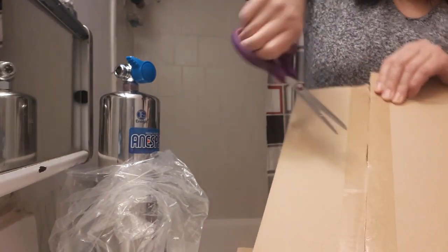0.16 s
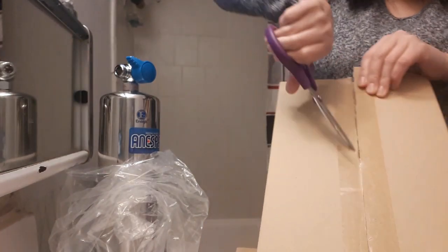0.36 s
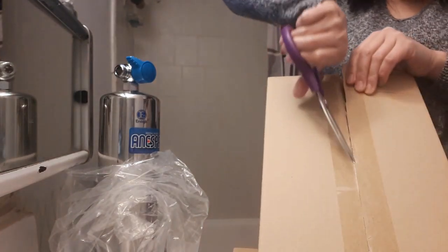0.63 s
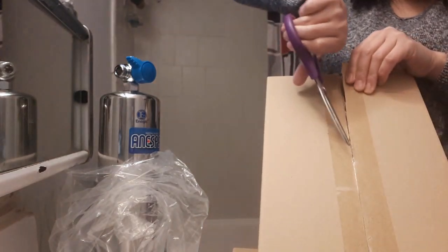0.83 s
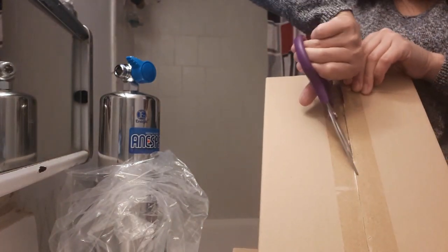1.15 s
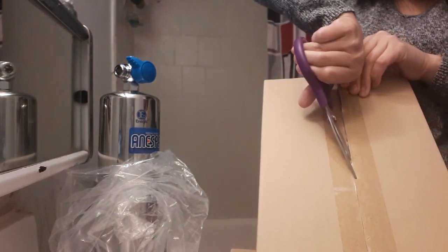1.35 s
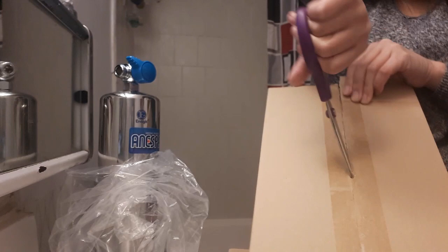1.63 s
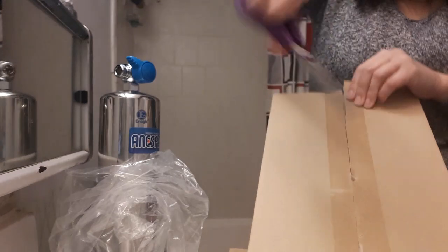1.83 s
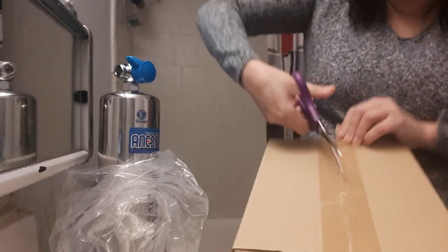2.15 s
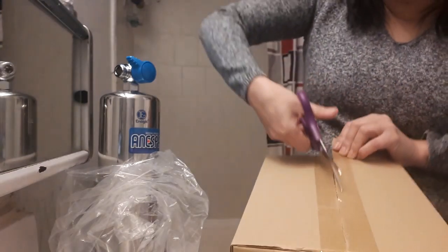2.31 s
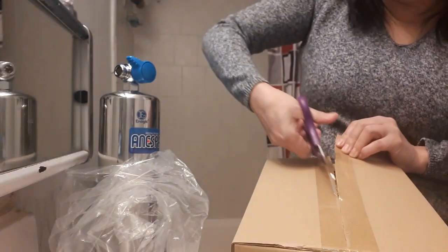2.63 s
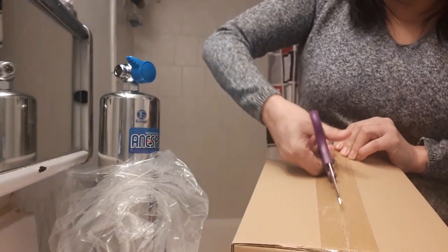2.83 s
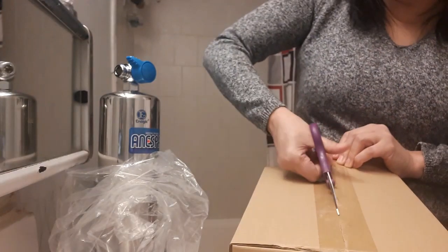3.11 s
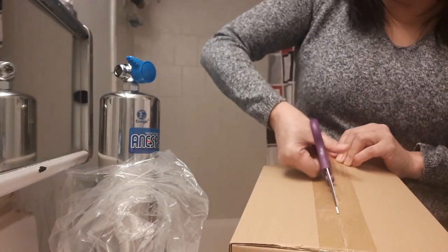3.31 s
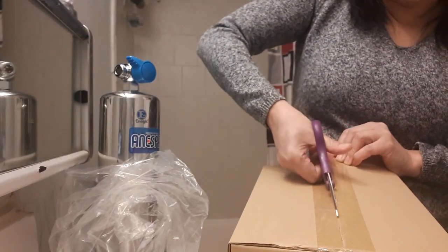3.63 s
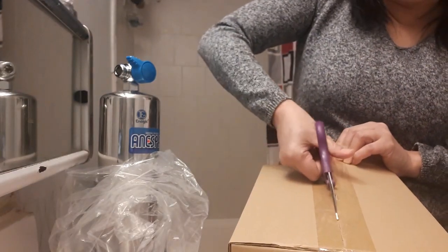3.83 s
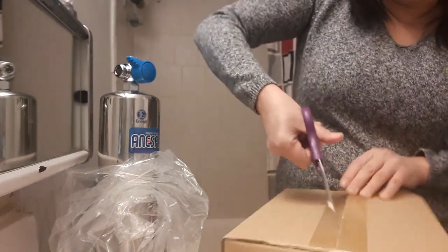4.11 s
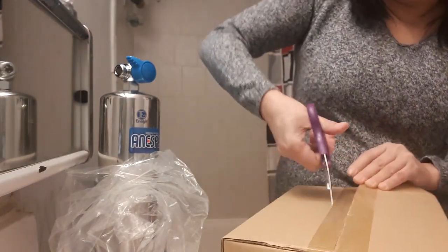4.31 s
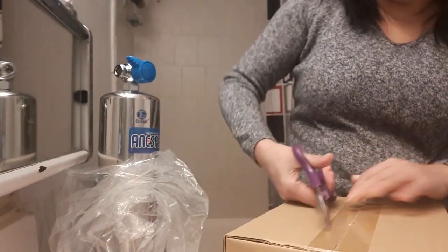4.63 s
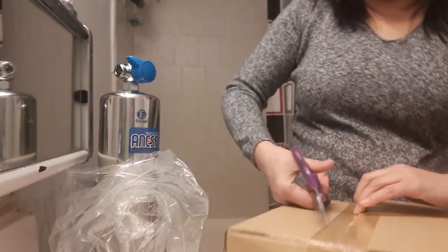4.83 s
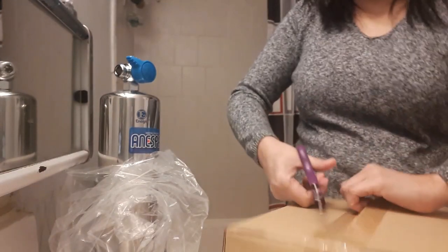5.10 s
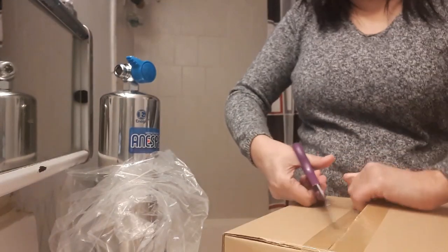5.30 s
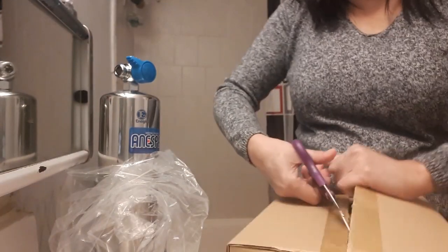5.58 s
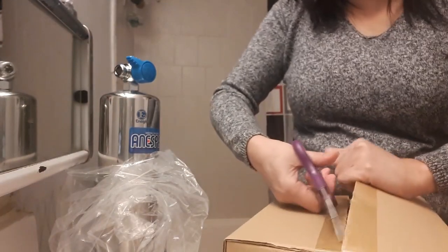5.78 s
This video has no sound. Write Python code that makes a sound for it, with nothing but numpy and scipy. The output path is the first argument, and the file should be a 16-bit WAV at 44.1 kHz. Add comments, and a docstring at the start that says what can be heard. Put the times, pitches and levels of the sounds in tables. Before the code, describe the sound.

Close, dry tape scraping and jerky boxy thumps as scissor blades work along a carton seam in a small quiet room.

```python
"""Scissors slit the packing tape on a cardboard box, close by in a small quiet room.
Two pushes hiss along the seam (filtered slips); the rubbed blades sing (a high resonance), light skims hiss.
Jerks then knock the hollow box (blows through its modes); fibres tick, tape twangs twice, cardboard rubs, creaks.
Heavy knocks after 4 s make the box boom on its support (a low decaying mode); the blades click (noise cracks).
At the end a run of ticks and a strong push rip a flap free. Faint room air (noise) lies under it all."""
import sys
import numpy as np
from scipy import signal
from scipy.io import wavfile

SR = 44100
rng = np.random.default_rng(int(sys.argv[2]) if len(sys.argv) > 2 else 0)


def unload_audio(sound):
    """Save the sound as a 16-bit wav file, at the path given as the first command line argument."""
    columns = np.transpose(np.atleast_2d(sound))
    # keep every value between -1 and 1, then stretch to whole-number steps
    steps = np.round(np.clip(columns, -1, 1) * 32767)
    wavfile.write(sys.argv[1], SR, steps.astype(np.int16))


N = 262395
TIME_S = np.arange(N) / SR
RING_S = np.arange(20480) / SR  # time axis of responses and short sounds
IMPULSE = RING_S == 0

# pushes of the blade along the seam:
# (time of hardest push [s], build-up [s], let-go [s], tape hiss level [dB], cardboard judder level [dB])
STROKES = [(0.088, 0.11, 0.038, -35, -44), (0.126, 0.05, 0.018, -34, -32.5), (1.027, 0.038, 0.15, -47, -45),
           (1.11, 0.059, 0.063, -47.5, -41), (1.277, 0.1, 0.14, -43, -35.5), (1.559, 0.038, 1, -44, -38.5),
           (2.4, 0.036, 0.12, -42, -38), (2.534, 0.0096, 0.12, -40, -51), (2.859, 0.067, 0.099, -42.5, -37),
           (2.939, 0.064, 0.25, -48.5, -39), (3.305, 0.031, 0.092, -48.5, -43.5),
           (3.415, 0.033, 0.071, -38.5, -34.5), (3.609, 0.017, 0.29, -38.5, -34.5),
           (3.902, 0.048, 0.3, -41.5, -38.5), (4.01, 0.044, 0.22, -38.5, -35.5),
           (4.211, 0.15, 0.11, -33, -36.5), (4.506, 0.081, 0.15, -39.5, -50),
           (5.291, 0.029, 0.29, -42, -41.5), (5.65, 0.25, 0.17, -41, -35.5),
           (5.609, 0.044, 0.1, -33, -25.5)]
# blows on the box: (time [s], level [dB], highest fully driven frequency [Hz], bass from lid flex [dB])
KNOCKS = [(0.466, -28, 2400, 4.5), (0.807, -37, 1320, -1), (1.045, -24, 2370, 8), (1.601, -29, 1100, -11.5),
          (1.684, -17.5, 1410, 2), (1.8, -15, 1510, 2), (2.384, -28.5, 2810, 4), (2.531, -36.5, 500, 14),
          (2.607, -29.5, 1200, 7.5), (2.623, -26, 2200, 8), (2.796, -34.5, 700, 3.5), (2.841, -23, 1880, 2),
          (2.856, -21.5, 900, 0), (2.939, -34.5, 890, 1.5), (3.051, -34.5, 710, -2.5),
          (3.375, -20, 4980, 2.5), (3.835, -29, 900, -6), (4.184, -16, 900, -7), (4.196, -18, 1190, -6),
          (4.364, -33.5, 794, 0), (4.502, -19, 2400, -4), (4.519, -17.5, 1400, -3.5),
          (4.531, -15, 1170, -3.5), (4.546, -16.5, 900, -2.5), (4.568, -25, 700, -5.5),
          (4.665, -26, 520, 4.5), (5.232, -32.5, 2010, 8), (5.248, -19, 373, -4.5), (5.519, -31, 600, 5.5),
          (5.696, -26.5, 1500, 7.5)]
# parting tape fibres: (time [s], level before the tape spectrum [dB])
TICKS = [(1.533, -41), (1.543, -33), (1.5577, -31), (1.607, -29), (1.684, -21), (1.801, -25.5),
         (2.5409, -33), (3.2115, -34), (3.375, -28.5), (3.8873, -31.5), (3.908, -30.5), (3.993, -31),
         (4.151, -35.5), (4.5, -23.5), (5.246, -34), (5.2836, -27.5), (5.5612, -28), (5.583, -26),
         (5.595, -22), (5.604, -16.5)]
# twangs of taut tape as the blade pops through: (time [s], level [dB], pitch [Hz])
TWANGS = [(1.684, -13, 815), (3.376, -5.5, 1190)]
# light sliding touches of hand and sleeve, no pressure on the box: (middle [s], half length [s], level [dB])
SKIMS = [(0.385, 0.15, -46), (0.63, 0.16, -47), (2.182, 0.2, -50.5), (4.8, 0.22, -55.5),
         (5.152, 0.11, -44.5), (5.95, 0.064, -42.5)]
# cardboard rubs as the box is turned, pressed or dented: (middle [s], half length [s], level [dB])
RUBS = [(1.1, 0.046, -42.5), (1.28, 0.069, -43.5), (1.81, 0.043, -33), (3.025, 0.043, -45.5),
        (3.86, 0.21, -49.5), (4.541, 0.026, -24.5), (4.6, 0.042, -41), (5.049, 0.088, -44),
        (5.64, 0.033, -35.5)]
# cardboard creaks under the hands: (middle [s], level [dB], pitch [Hz], half length [s])
CREAKS = [(2.765, -46, 950, 0.03), (3.302, -41.5, 1040, 0.0063), (3.882, -40.5, 226, 0.25),
          (3.949, -36.5, 1080, 0.011), (4.708, -35, 520, 0.037)]
# rubbed, singing blades: (middle [s], half length [s], level [dB])
BLADE_SONGS = [(0.35, 0.077, -48), (0.47, 0.092, -49), (0.64, 0.08, -53.5)]
# blades clicking against each other: (time [s], level [dB])
BLADE_CLICKS = [(4.667, -46.5), (4.998, -45), (5.4836, -38)]
# box rocking on its support: (time [s], level [dB])
ROCKS = [(4.187, -39), (4.532, -35.5), (5.245, -42)]

# modes of panels and enclosed air, before shifts by place: (frequency [Hz], relative level [dB], t60 [s])
BOX_MODES = [(132.1, -4, 1), (156.1, -1.5, 0.34), (199.4, -1, 0.21), (229, 7, 0.085), (348.7, -6, 0.38),
             (417.6, 8, 0.079), (531, -3, 0.27), (720, -1.5, 0.12), (1080, -1, 0.043), (1726, 18, 0.05)]
# spectrum of struck cardboard: (frequency [Hz], gain [dB])
CARDBOARD_SPECTRUM = [(40, -45), (90, -18.5), (150, 1.5), (230, 1.5), (450, -3.5), (750, -7.5), (1200, -8),
                      (1500, -16), (2200, -13.5), (4000, -22), (7400, -15.5), (8500, -41), (12000, -35)]
# spectrum of scraped tape: (frequency [Hz], gain [dB])
TAPE_SPECTRUM = [(80, -11), (250, -2.5), (1100, 5.5), (1420, -3.5), (1850, 3), (4500, -3), (6000, -4),
                 (7400, -2), (8600, -15), (11500, -9), (16000, -11)]
# spectrum of the dragged box: (frequency [Hz], gain [dB])
JUDDER_SPECTRUM = [(40, -31.5), (95, -20.5), (150, 1), (450, -3), (750, -5), (1150, -11), (1800, -14),
                   (9000, -40.5)]
# colour a light touch adds to tape hiss: (frequency [Hz], gain [dB])
SKIM_SPECTRUM = [(400, -0.5), (950, -1), (7400, 0.5), (11500, 2)]
# spectrum of rubbed cardboard: (frequency [Hz], gain [dB])
RUB_SPECTRUM = [(200, -3), (450, 4), (1050, -1.5), (1450, -17), (1900, -9.5), (5000, -40.5)]
# spectrum of the room's air: (frequency [Hz], gain [dB])
AIR_SPECTRUM = [(25, -34), (65, -4), (150, -10), (1000, -16), (7000, -20), (16000, -29.5)]
# room decay: (frequency [Hz], t60 [s])
ROOM_DECAY = [(100, 0.51), (260, 0.35), (700, 0.25), (1840, 0.19), (5000, 0.18), (14000, 0.14)]
# left-right likeness of reflections: (frequency [Hz], likeness [0..1])
LIKENESS = [(130, 0.99), (290, 0.92), (640, 0.32), (1400, 0.035), (3000, 0.12)]

STROKE_RANGE_DB = 20  # fall after one let-go time
CATCH_DB, CATCH_S = 2.5, 0.018  # spread and time step of the catching contact
BITE_DB = 21  # gain from drag to crackle
PLACE_DB = 1  # largest change of a mode's level with the place of contact
RETUNE_SHARE, RETUNE_ABOVE_HZ = 0.07, 620  # largest pitch shift, for modes above this
FLEX_HZ = 172  # lid flex acts fully below this
SOFT_DB_PER_OCTAVE = 9.5  # treble loss above a blow's hardness
SUDDEN_GAIN, SUDDEN_GAIN_PER_OCTAVE = 0.68, 0.15  # impulse in a 1 kHz blow, beside a crunch of energy 1
BLOW_S = 0.02  # nominal duration over which a blow's level counts
SNAP_LOW_HZ = 500  # a snapping fibre fades below this
TWANG_T60_S = 0.015
BLADE_HZ, BLADE_WIDTH_HZ = 7620, 1400  # width of each of two passes
ROCK_HZ, ROCK_T60_S = 65.5, 0.94
EDGE_HZ = 15850


def stroke():
    """Fine slips hiss along the seam, with a few sharper crackles; coarser ones judder through the box."""
    sliding, drag = effort()
    # too fine to sound alike on both sides
    fine = np.array([slips(N, per_s=14000, spread_db=2.5) for side in "LR"])
    bite = np.clip(amp(BITE_DB) * drag, 0, .8)  # harder drag crackles more
    crackle = bite * slips(N, per_s=330, spread_db=8.5)
    hiss = sliding * unit(colour(fine + crackle, TAPE_SPECTRUM))
    coarse = slips(N, per_s=520, spread_db=5.5)
    judder = drag * unit(colour(through(coarse, box(ring_db=-53)), JUDDER_SPECTRUM))
    near_hiss = travelling(hiss, early_db=-12, room_db=-8)
    return near_hiss + travelling(judder, early_db=3.5, room_db=-4)


def effort():
    """Strength of hiss and judder: a push swells, then dies away unevenly."""
    power = np.zeros((2, N))
    for s, build_s, let_go_s, hiss_db, judder_db in STROKES:
        away = np.where(TIME_S < s, ((s - TIME_S) / build_s) ** 2, (TIME_S - s) / let_go_s)
        near = away < 4
        level_db = np.array([[hiss_db], [judder_db]]) - STROKE_RANGE_DB * away[near]
        power[:, near] += amp(level_db) ** 2
    return np.sqrt(power) * catching()


def catching():
    """A gain that wanders at random, as a sliding contact catches and frees itself."""
    knots_s = np.arange(0, TIME_S[-1], CATCH_S)
    return amp(CATCH_DB * np.interp(TIME_S, knots_s, rng.standard_normal(len(knots_s))))


def travelling(x, early_db, room_db, count=3):
    """The contact moves along the seam or box, so its pattern of reflections keeps changing."""
    phases = 1.7 * TIME_S + np.arange(count)[:, None] / count
    shares = np.cos(np.pi * phases) * np.sqrt(2 / count)
    return sum(through(x * share, space(early_db, room_db)) for share in shares)


def knocks():
    """A jerk is a blow and a short crunch; hard ones are brighter and more sudden, lid flex shifts the bass."""
    out = np.zeros((2, N))
    hz = np.geomspace(40, SR / 2, 40)
    for s, db, hard_hz, flex_db in KNOCKS:
        sudden = SUDDEN_GAIN + SUDDEN_GAIN_PER_OCTAVE * np.log2(hard_hz / 1000)
        force = sudden * IMPULSE + burst(decay_s=0.0043, per_s=4000, spread_db=2.5)
        boxed = through(force, box(ring_db=-58))
        blow = colour(through(boxed, space(early_db=-1, room_db=-4)), CARDBOARD_SPECTRUM)
        bass_db = read([(FLEX_HZ, flex_db), (2 * FLEX_HZ, 0)], hz)
        loss_db = SOFT_DB_PER_OCTAVE * np.log2(np.maximum(hz / hard_hz, 1))
        add(out, s, sized(colour(blow, np.c_[hz, bass_db - loss_db]), db))
    return out


def box(ring_db):
    """The push, then ringing panels and air; place of contact shifts mode levels and retunes high modes."""
    place, detune = rng.uniform(-1, 1, (2, len(BOX_MODES)))
    response = IMPULSE.astype(float)
    for (hz, db, t60_s), shift, bend in zip(BOX_MODES, place, detune):
        mode_hz = hz * (1 + RETUNE_SHARE * bend * (hz > RETUNE_ABOVE_HZ))
        response += ping(ring_db + db + PLACE_DB * shift, mode_hz, t60_s)[0]
    return response


def ticks():
    """A few fibres of tape snap almost together; they are too small to give much bass."""
    out = np.zeros((2, N))
    for s, db in TICKS:
        fibres = 0.72 * IMPULSE + burst(decay_s=0.0014, per_s=6200, spread_db=9)
        add(out, s, sized(through(fibres, space(early_db=-1.5, room_db=-1.5)), db))
    thin = signal.lfilter(*signal.butter(1, SNAP_LOW_HZ, "high", fs=SR), out)
    return colour(thin, TAPE_SPECTRUM)


def twangs():
    """The stretched tape rings briefly when it gives way, in a quick run of small tears."""
    out = np.zeros((1, N))
    for s, db, hz in TWANGS:
        tears = IMPULSE + .5 * burst(decay_s=0.005, per_s=3000, spread_db=2)
        add(out, s, through(tears, ping(db, hz, TWANG_T60_S)))
    return through(out, space(early_db=-14, room_db=-7))


def skims():
    """A light sliding touch gives a smooth, airy hiss."""
    hiss = unit(colour(colour(rng.standard_normal((2, N)), TAPE_SPECTRUM), SKIM_SPECTRUM))
    return travelling(arches(SKIMS) * hiss, early_db=-10, room_db=-9)


def rubs():
    """Cardboard slides and crushes: gritty slips of uneven size sound a broad band of the panels."""
    level = arches(RUBS) * catching()
    grit = slips(N, per_s=330, spread_db=6)
    return travelling(level * unit(colour(grit, RUB_SPECTRUM)), early_db=-2, room_db=-5)


def creaks():
    """A quick run of slips sounds one broad resonance of a panel."""
    out = np.zeros(N)
    for s, db, hz, half_s in CREAKS:
        run = slips(N, per_s=720, spread_db=4.5)
        out += arches([(s, half_s, db)]) * resonate(run, hz, width_hz=0.52 * hz)
    return through(out, space(early_db=1.5, room_db=-7))


def blades():
    """Steel sings in one high resonance when rubbed; a click is a short, dry, bright crack."""
    song = resonate(rng.standard_normal(N), BLADE_HZ, BLADE_WIDTH_HZ)
    song = unit(colour(song, TAPE_SPECTRUM))
    out = through(song * arches(BLADE_SONGS) * catching(), space(early_db=-3, room_db=-8))
    for s, db in BLADE_CLICKS:
        crack = burst(decay_s=0.0013, per_s=24000, spread_db=1)
        add(out, s, sized(through(crack, space(early_db=-7, room_db=-10)), db))
    return out


def rocking():
    """The whole box booms low on its support, building up over about a cycle."""
    out = np.zeros((2, N))
    swell = 1 - np.exp(-TIME_S * ROCK_HZ)
    for s, db in ROCKS:
        add(out, s, swell * ping(db, ROCK_HZ, ROCK_T60_S, TIME_S))
    return out


def quiet():
    """The faint air of the room: steady coloured noise."""
    air = through(rng.standard_normal(N), space(early_db=0, room_db=10))
    return amp(-63) * unit(colour(air, AIR_SPECTRUM))


def space(early_db, room_db, early_t60_s=0.05, lag_s=0.00012):
    """Stereo response: direct sound (right lags), quick scatter off box and nearby walls, then the room."""
    hz, t, (a, b) = signal.stft(rng.standard_normal((2, len(RING_S))), SR, nperseg=512)
    alike = read(LIKENESS, hz)[:, None]
    z = np.array([a, alike * a + np.sqrt(1 - alike ** 2) * b])
    early = signal.istft(z, SR)[1] * amp(-60 * RING_S / early_t60_s) * (RING_S > .0006)
    room_decay = amp(-60 * t / read(ROOM_DECAY, hz)[:, None])
    late = signal.istft(z * room_decay, SR)[1] * (1 - np.exp(-RING_S / .006))
    out = amp(early_db) * early / np.linalg.norm(early[0])
    out += amp(room_db) * late / np.linalg.norm(late[0])
    out[0, 0] += 1
    out[1, round(lag_s * SR)] += 1
    return out / np.linalg.norm(out[0])


def slips(count, per_s, spread_db):
    """Stick-slip: sparse clicks of uneven size, rms 1."""
    chance, size = rng.random(count), rng.standard_normal(count)
    sign = rng.choice([-1, 1], count)
    return unit((chance < per_s / SR) * sign * amp(spread_db * np.clip(size, -2, 2)))


def burst(decay_s, per_s, spread_db):
    """A cluster of slips that dies away, with energy 1."""
    cluster = slips(len(RING_S), per_s, spread_db) * np.exp(-RING_S / decay_s)
    return cluster / (np.linalg.norm(cluster) + 1e-9)


def ping(db, hz, t60_s, t=RING_S):
    """One dying mode."""
    return (amp(db - 60 * t / t60_s) * np.cos(2 * np.pi * hz * t))[None]


def resonate(x, hz, width_hz):
    """A resonance applied twice, rms 1."""
    pole = np.exp(np.pi * (2j * hz - width_hz) / SR)
    return unit(signal.lfilter([1], np.poly([pole, pole]), x).real)


def arches(rows):
    """Level of smooth swells given as (middle [s], half length [s], level [dB])."""
    power = sum((amp(db) * np.exp(-((TIME_S - s) / half_s) ** 2)) ** 2 for s, half_s, db in rows)
    return np.sqrt(power)


def sized(sound, db):
    """Scales a stereo blow to its level, taken as if all of it fell within BLOW_S."""
    return amp(db) * sound / np.sqrt((sound ** 2).sum() / (2 * BLOW_S * SR))


def colour(x, points, size=4096):
    """Causal minimum-phase filter with the given spectrum, so that attacks stay sharp."""
    log_gain = np.log(amp(read(points, abs(np.fft.fftfreq(size, 1 / SR)))))
    response = np.fft.ifft(np.exp(np.conj(signal.hilbert(log_gain)))).real
    return through(x, response[:size // 2])


def through(x, response):
    """Convolves, keeping the length of x."""
    return signal.fftconvolve(np.atleast_2d(x), np.atleast_2d(response), axes=1)[:, :x.shape[-1]]


def read(points, hz):
    """Reads a table on a log-frequency axis."""
    f, value = np.transpose(points)
    return np.interp(np.log(hz + 1), np.log(f + 1), value)


def add(mix, s, sound):
    """Mixes a sound in at time s."""
    part = mix[:, max(round(s * SR), 0):][:, :sound.shape[1]]
    part += sound[:, :part.shape[1]]


def amp(db):
    """Decibels to gain."""
    return 10 ** (np.asarray(db) / 20)


def unit(x):
    """Scales to rms 1."""
    return x / np.sqrt(np.mean(x ** 2) + 1e-20)


def scene():
    """All sounds of the box and room; the balance leans right, most in the lows."""
    tape = stroke() + ticks() + twangs() + skims()
    cardboard = knocks() + rubs() + creaks() + rocking()
    left, right = tape + cardboard + blades() + quiet()
    # (frequency [Hz], gain added left and taken from the right [dB])
    lean = np.array([(280, -1.46), (500, -0.016), (1000, -0.46)])
    return np.vstack([colour(left, lean), colour(right, lean * [1, -1])])


def record(dry):
    """The band limit of the recorder: a linear-phase low-pass."""
    lowpass = signal.firwin(511, EDGE_HZ, window=("kaiser", 9), fs=SR)
    return signal.oaconvolve(dry, lowpass[None], "same")


dry = scene()
out = record(dry)
unload_audio(out)
```